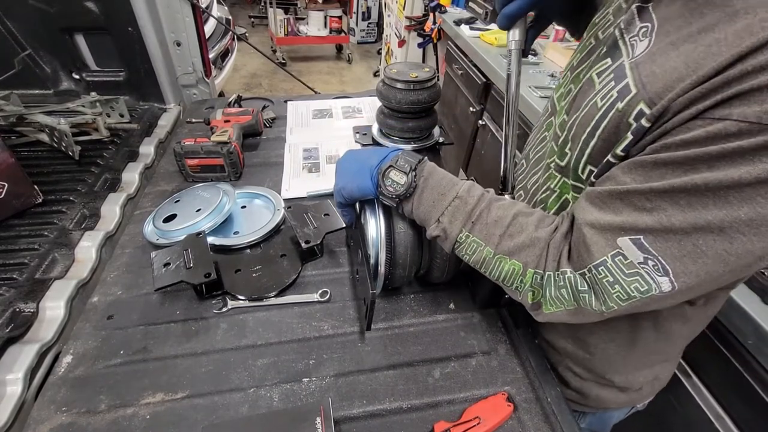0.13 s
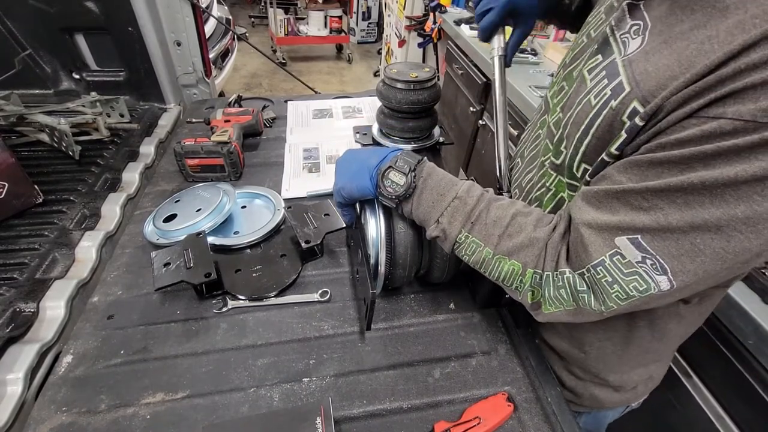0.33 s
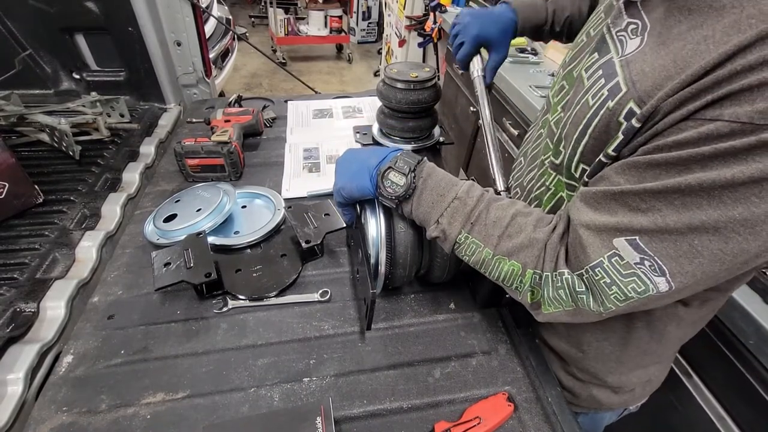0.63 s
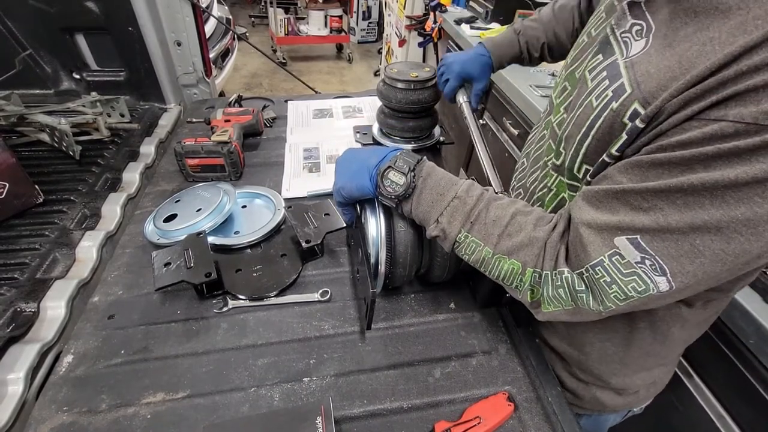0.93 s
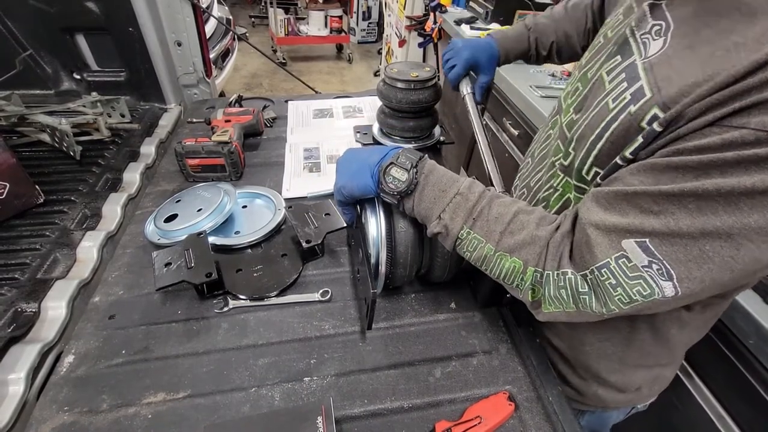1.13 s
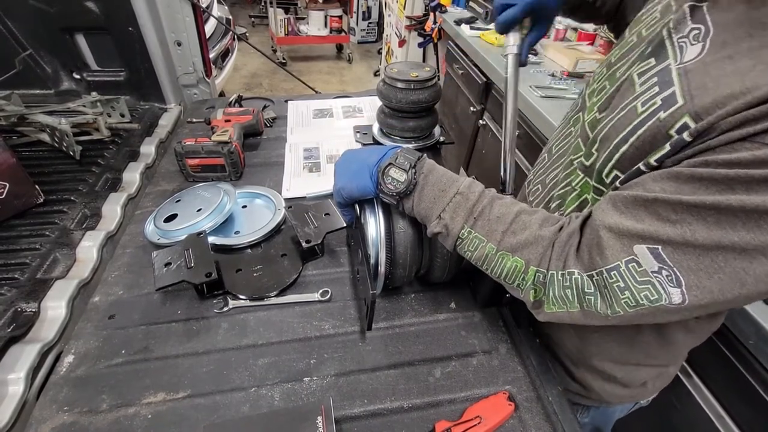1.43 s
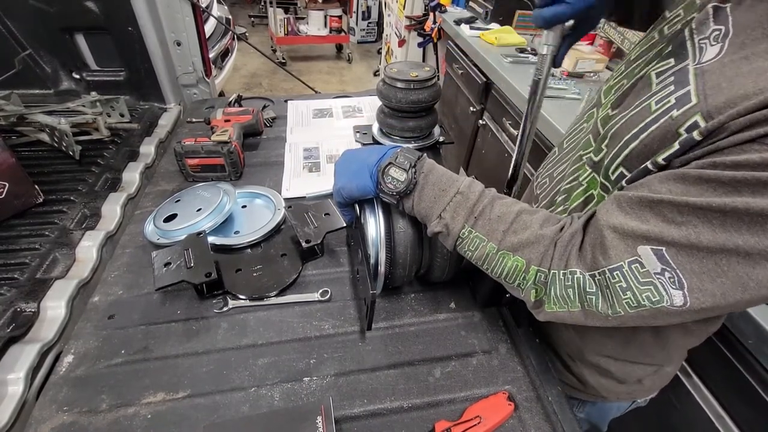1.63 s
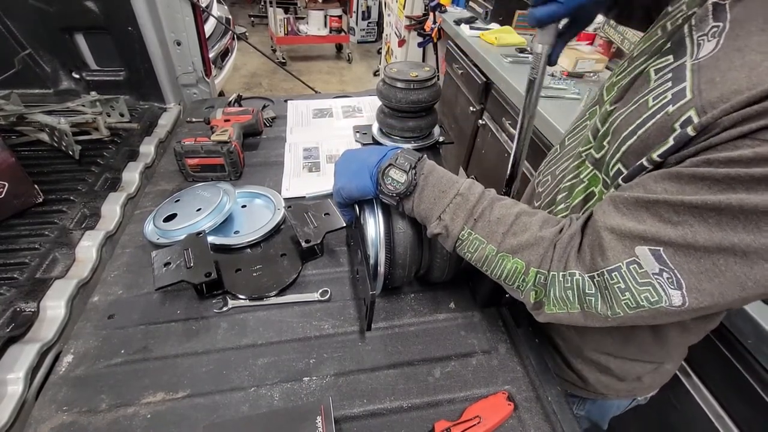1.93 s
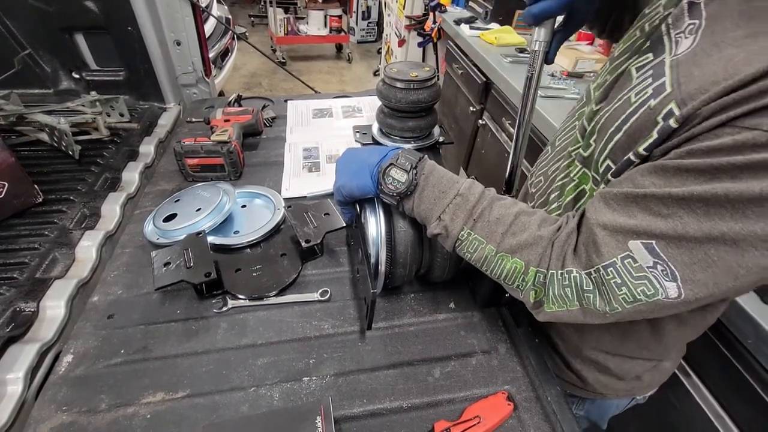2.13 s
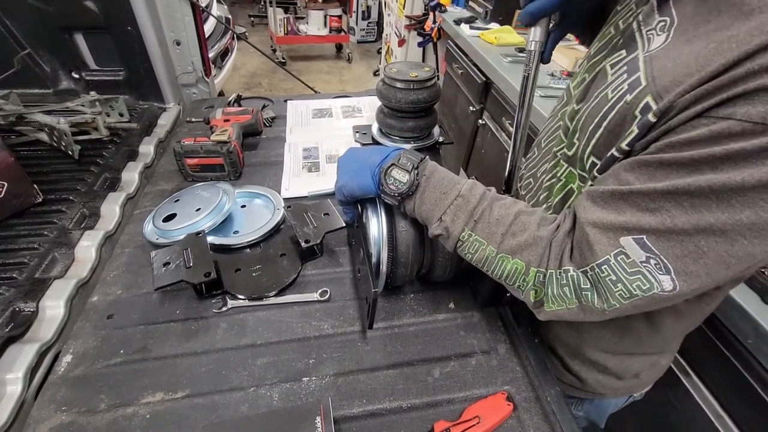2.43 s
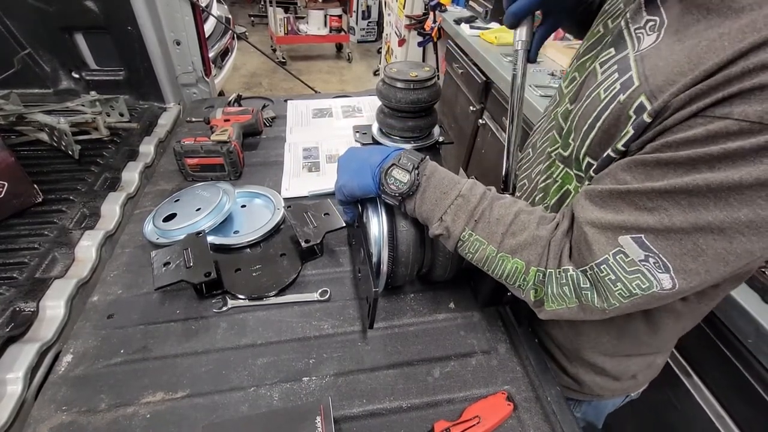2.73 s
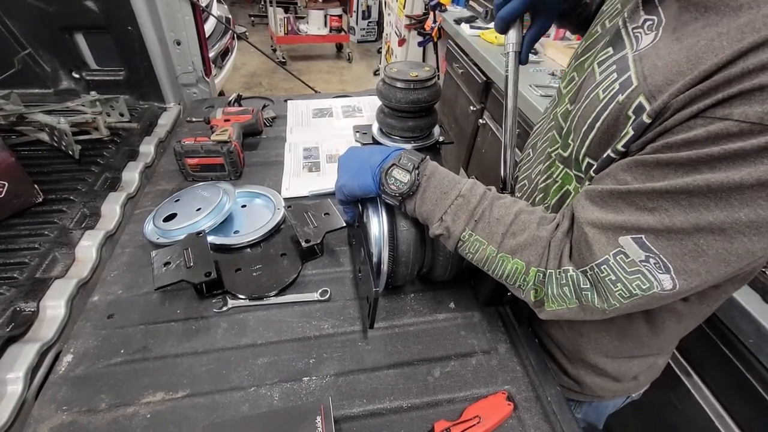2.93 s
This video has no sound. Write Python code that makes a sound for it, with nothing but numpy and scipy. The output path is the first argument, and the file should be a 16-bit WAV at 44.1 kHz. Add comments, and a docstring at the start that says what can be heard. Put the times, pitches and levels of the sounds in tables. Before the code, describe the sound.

Torque wrench tightening a bolt on a steel bracket in a pickup bed: muffled knocks, a short run of steel ratchet clicks, faint glove rubbing, near quiet, then one hard ringing snap in a reflective workshop.

```python
"""Torque wrench in a pickup bed

A stereo pair in a workshop hears a click-type torque wrench tighten a bolt on a steel bracket lying in the bed.
Ventilation rumbles behind, with one brief early hiss. The handle swings back: noise-burst knocks thud into the bed
in sagging tones, glove and sleeve rub, and the pawl ticks over eight teeth as filtered bursts with rings.
More dull knocks follow under the pull, until the wrench breaks over with one loud crack and ringing modes,
and the bracket thumps and rocks. Generated reflections place the sounds in the room."""
import sys
import numpy as np
from scipy import signal
from scipy.fft import rfft, irfft, next_fast_len
from scipy.io import wavfile

SR = 44100
rng = np.random.default_rng(int(sys.argv[2]) if len(sys.argv) > 2 else 0)


def put_to_file(sound):
    """Save the sound as 16-bit audio at rate SR, in the file named by the first command-line argument."""
    columns = np.atleast_2d(sound).T  # one column per channel
    safe = np.clip(columns, -1, 1)
    whole_steps = np.round(safe * 32767)
    wavfile.write(sys.argv[1], SR, whole_steps.astype(np.int16))


N = 136710
TIME = np.arange(N) / SR

# Likeness of the two microphones: hz, correlation
MIC_LIKENESS = [(60, 0.92), (130, 0.88), (260, 0.73), (500, 0), (1500, 0), (8000, 0.083), (15000, 0.054)]
# Workshop: hz, reverberation_t60_s, late_level_db, near_reflection_level_db
ROOM_BANDS = [(59, 0.76, -9.5, -8), (235, 0.56, 1, 4.5), (1000, 0.29, 0, -1), (2920, 0.74, -7, 2),
              (6500, 0.27, 8, -4.5), (9600, 0.33, -15.5, -13.5), (15000, 0.45, -9.5, -2.5)]
NEAR_T60_S, REFLECTION_RISE_S = 0.15, 0.00076

# Ventilation spectrum: hz, relative_density_db (per Hz)
VENTILATION_SPECTRUM = [(25, -22), (50, -2.5), (78, 1.5), (115, -2), (170, -14.5), (260, -7.5), (400, -17),
                        (560, -17.5), (780, -17.5), (1200, -27.5), (2000, -34), (3000, -37), (4700, -44.5),
                        (7400, -43.5), (8600, -58), (11300, -55.5), (12500, -47.5), (16000, -46)]
VENTILATION_DB = -57.5
# Colour of the brief soft hiss: hz, relative_level_db
HISS_SPECTRUM = [(200, -43), (1000, 0), (3000, -1.5), (4500, 0.5), (6300, 7.5), (8500, 0.5), (12000, -4.5),
                 (15500, -10)]
HISS_START_S, HISS_RISE_S, HISS_FALL_S, HISS_DB = 0.081, 0.013, 0.045, -37

# The bracket shifts on the bed: start_s, thud_level_db, thud_start_hz, contact_level_db, contact_lowpass_hz
KNOCKS = [(1.033, -43.5, 349, -24, 1200), (1.083, -51, 406, -33.5, 7300), (1.109, -38.5, 376, -43, 505),
          (1.153, -41, 351, -21, 2300), (1.176, -45.5, 370, -26.5, 1100), (1.200, -39.5, 197, -31, 1530),
          (1.249, -46, 341, -36.5, 800), (1.270, -45.5, 172, -48, 604), (1.889, -58, 476, -31, 990),
          (1.896, -40.5, 389, -36.5, 615), (1.923, -55, 477, -37, 500), (1.953, -41.5, 339, -36.5, 1200),
          (1.994, -51.5, 330, -35.5, 1213), (2.037, -39, 399, -28.5, 770), (2.066, -39.5, 175, -33, 600),
          (2.286, -51.5, 443.6, -41, 910), (2.372, -51, 95, -60, 509), (2.899, -56, 378, -31, 900),
          (3.027, -34.5, 358, -34, 700), (3.068, -36.5, 192, -19, 587)]
KNOCK_RISE_S, KNOCK_FALL_S, KNOCK_ROOM_DB = 0.0014, 0.0015, 0
THUD_PEAK_S, THUD_SAG_S, THUD_END_HZ, THUD_ROOM_DB = 0.0094, 0.01516, 91.3, -8.5
TOOTH_THUD_HZ, TOOTH_THUD_LAG_S = 306.6, 0.00408
# Colour of the steel bracket's clack: hz, relative_level_db
CLACK_SPECTRUM = [(300, 1.5), (550, -5), (750, 7.5), (930, -3.5), (1130, 4.5), (1420, -8.5), (1830, -1),
                  (2020, -16), (2250, -5.5), (2600, -6), (2870, -5), (3200, -13), (3520, -2), (3900, -12),
                  (5000, -12.5), (7000, -6.5), (11000, -29)]
# Ring of the steel bracket, relative to each contact: hz, level_db, t60_s
BRACKET_MODES = [(751, -35, 0.11), (1146, -46, 0.08), (1700, -43, 0.15), (1818, -40, 0.13),
                 (2900, -56, 0.064), (3532, -41.5, 0.2)]
# Ring of the bed under the bracket, relative to each thud: hz, level_db, t60_s
BED_MODES = [(31.3, -10, 0.56), (77.7, -2.5, 0.4), (121.3, 6, 0.22), (163.6, 4, 0.18), (233, -4, 0.14),
             (274, 2, 0.08), (330, -2, 0.1), (388.5, 2.5, 0.12), (477, -12.5, 0.2), (602, 0, 0.13)]
BED_RING_DB, BED_LOWPASS_HZ = -10, 380

# Faint rubbing of glove and sleeve: start_s, level_db, fall_s (the rise takes half as long)
RUBS = [(1.177, -28.5, 0.11), (1.938, -40, 0.015), (2.04, -35.5, 0.031), (2.208, -33.5, 0.035),
        (2.268, -37, 0.024)]
# Colour of the rubbing: hz, relative_level_db
RUB_SPECTRUM = [(400, 5.5), (800, 6), (1800, -6), (3800, -14), (7000, -18), (11000, -30)]
GRIT_SPREAD_DB, GRIT_PER_S = 7.5, 350

# The pawl drops over a tooth: start_s, level_db (added to PAWL_DB), tilt_db_per_octave, bed_thud_level_db,
# pan_db (left minus right), rise_s, brightest_ring_hz, clink_hz, clink_db (added to CLINK_DB),
# muted_hz, brightest_ring_db
TEETH = [(1.2841, 0, -2, -54, 1.5, 0.0023, 2770, 1750, -8, 1420, 9),
         (1.3507, 0, -1, -55, -1, 0.0022, 6050, 1135, 5, 1950, -7),
         (1.4175, 3, -1, -64, -1, 0.00072, 1280, 598, -1.5, 4300, 8),
         (1.4781, 3.5, -1, -47, 1, 0.0027, 3530, 607, -6.5, 1350, -1),
         (1.5423, 4, 2.3, -40.5, 0.5, 0.0023, 5200, 1138, -2.5, 1450, 3),
         (1.621, 1, 0, -64, 1, 0.002, 6140, 1146, -19, 2560, -2),
         (1.7104, 1.5, 2.5, -45.5, 2, 0.0028, 6560, 950, -7.5, 1900, 8),
         (1.8227, -9, 0, -52.5, 1, 0.0011, 5200, 784, 0, 2130, 18)]
PAWL_DB, PAWL_FALL_S, PAWL_ROOM_DB = -21.5, 0.00158, 0.5
# Colour of a tooth before its tilt: hz, relative_level_db
PAWL_SPECTRUM = [(300, -1), (800, -7), (1250, -9.5), (1600, -4.5), (2400, -3), (3400, -1), (4200, -4.5),
                 (5400, 0.5), (6700, 2.5), (8500, -4.5), (10000, -3.5), (11800, -10), (15000, -6)]
# Ring of the ratchet head, relative to the tick: hz, level_db, t60_s
HEAD_MODES = [(1126, -43.5, 0.05), (1238, -32, 0.02), (1750, -50.5, 0.11), (3340, -45, 0.062),
              (6240, -46.5, 0.11), (7800, -46, 0.14)]
BRIGHT_WIDTH_HZ, MUTE_Q = 300, 5.1
BOUNCE_GAIN, BOUNCE_RANGE_S = 0.38, (0.00037, 0.0014)
CLINK_DB, CLINK_T60_S = -27.5, 0.071

# Colour of the break-over crack: hz, relative_level_db
BREAK_SPECTRUM = [(200, -5.5), (500, 3.5), (750, 1), (1130, 2.5), (1450, -6), (1800, -5), (2150, -6),
                  (2800, -8), (3330, 0), (4400, -15), (5250, -12), (6300, -17.5), (7100, -8), (7650, -4),
                  (8400, -18.5), (10500, -20.5), (12500, -22.5), (15000, -23)]
# Wrench, bracket and bed ring together as the load lets go: hz, level_db, t60_s
JOLT_MODES = [(59.7, -18.5, 0.2), (109.5, -32, 0.26), (129, -27.5, 0.13), (193, -31, 0.24),
              (261, -34, 0.14), (368, -30.5, 0.14), (403, -41, 0.064), (486, -38.5, 0.23),
              (556, -35.5, 0.13), (760, -44, 0.12), (1010, -48, .1), (1036, -52.5, 0.11),
              (1154, -39.5, 0.091), (2950, -46, .2), (3260, -52, 0.16), (3317, -39.5, 0.15),
              (3454, -47, 0.11), (7280, -60, 0.2), (7800, -60, 0.28)]
BREAK_START_S, BREAK_DB, BREAK_RISE_S, BREAK_FALL_S = 2.9922, -5, 0.00054, 0.003
BREAK_ROOM_DB, JOLT_ROOM_DB = 0, -8

BUILD_UP_CYCLES = 0.59  # time constant of a struck mode
CUTOFF_HZ = 16000


def from_db(db):
    """Decibels to gain."""
    return 10 ** (np.asarray(db) / 20)


def at_hz(points, hz, axis=1):
    """Read a table column on a log-frequency axis."""
    table = np.array(points)
    return np.interp(np.log(np.maximum(hz, 1)), np.log(table[:, 0]), table[:, axis])


def add(out, start_s, sound):
    """Mix a sound in at a time."""
    i = int(start_s * SR)
    out[:, i:i + sound.shape[-1]] += sound[..., :N - i]


def stereo_noise(size):
    """White noise at two microphones, alike in the bass and nearly unrelated in the treble."""
    alike = np.clip(at_hz(MIC_LIKENESS, np.fft.rfftfreq(size, 1 / SR)), -1, 1)
    mid, side = rfft(rng.standard_normal((2, size)))
    shared = np.sqrt((1 + alike) / 2) * mid
    opposed = np.sqrt((1 - alike) / 2) * side * [[1], [-1]]
    return irfft(shared + opposed, size)


def colour(x, spectrum, tilt_db=0):
    """Causal (minimum-phase) filter with the given spectrum and unit power gain."""
    size = 2 * next_fast_len(x.shape[-1])
    hz = np.fft.rfftfreq(size, 1 / SR)
    octaves = np.log2(np.maximum(hz, spectrum[0][0]))
    gain = from_db(at_hz(spectrum, hz) + tilt_db * octaves)
    cepstrum = irfft(np.log(gain / np.sqrt(np.mean(gain ** 2))))
    # Folding the cepstrum forward in time gives minimum phase
    cepstrum[1:size // 2] *= 2
    cepstrum[size // 2 + 1:] = 0
    response = np.exp(rfft(cepstrum))
    return irfft(rfft(x, size) * response)[..., :x.shape[-1]]


def soften(x, hz):
    """A soft contact: two-pole low-pass."""
    return signal.sosfilt(signal.butter(2, min(hz, SR / 3), fs=SR, output="sos"), x)


def chatter(rise_s, fall_s):
    """A contact's rush of tiny impacts: noise that swells and dies, of nearly even spectrum and unit energy."""
    t = TIME[:SR // 2]
    swell = np.minimum(t / rise_s, 1) * np.exp(-np.maximum(t - rise_s, 0) / fall_s)
    x = stereo_noise(len(t)) * swell
    # Alternately flatten the spectrum and confine the burst in time
    for _ in range(4):
        flat = irfft(np.exp(1j * np.angle(rfft(x))), len(t))
        x = flat * np.minimum(5 * swell, 1)
    return x / np.sqrt(np.sum(x ** 2, axis=1, keepdims=True))


def ring(modes, scatter_db=0):
    """Struck modes build up over part of a cycle; the higher ones reach the two microphones out of step."""
    t, out = TIME[:SR // 2], 0
    for hz, db, t60_s in modes:
        half_angle = np.arccos(np.clip(at_hz(MIC_LIKENESS, hz), -1, 1)) / 2
        phase = half_angle * rng.choice([-1, 1]) * np.array([[1], [-1]])
        decay = from_db(db + scatter_db * rng.normal() - 60 * t / t60_s)
        build_up = 1 - np.exp(-t * hz / BUILD_UP_CYCLES)
        out = out + rng.choice([-1, 1]) * decay * build_up * np.sin(2 * np.pi * hz * t + phase)
    return out


def workshop():
    """Impulse response: quick reflections off the bed walls, then the hall, each octave dying at its own rate."""
    t, out = TIME[:SR * 2 // 3], 0
    white, bins = rfft(stereo_noise(len(t))), np.fft.rfftfreq(len(t), 1 / SR)
    for hz in 62.5 * 2 ** np.arange(9):
        octave = np.maximum(1 - abs(np.log2((bins + 1) / hz)), 0)
        band = irfft(white * octave, len(t))
        late = at_hz(ROOM_BANDS, hz), at_hz(ROOM_BANDS, hz, axis=2)
        near = NEAR_T60_S, at_hz(ROOM_BANDS, hz, axis=3)
        for t60_s, db in late, near:
            decay = from_db(-60 * t / t60_s) * np.minimum(t / REFLECTION_RISE_S, 1) ** 2
            out = out + from_db(db) * band * decay / np.sqrt(np.sum(decay ** 2))
            band = band[:, ::-1]  # the same noise backwards serves the near reflections
    return out


def in_room(x, room, wet_db):
    """Direct sound plus its reflections, which are fed from the left channel."""
    wet = signal.fftconvolve(x[:1], room, axes=1)[:, :x.shape[-1]]
    return x + from_db(wet_db) * wet


def background(room):
    """Steady ventilation as coloured noise, and one brief soft hiss as a slow noise burst."""
    # One second of lead-in lets the filter settle
    out = from_db(VENTILATION_DB) * colour(stereo_noise(N + SR), VENTILATION_SPECTRUM)[:, SR:]
    hiss = from_db(HISS_DB) * colour(chatter(HISS_RISE_S, HISS_FALL_S), HISS_SPECTRUM)
    add(out, HISS_START_S, in_room(hiss, room, wet_db=7.5))
    return out


def bending_wave(start_hz):
    """A thud crosses the sheet-metal bed: its higher tones arrive first, so the pitch sags."""
    t = TIME[:SR // 4]
    hz = THUD_END_HZ + (start_hz - THUD_END_HZ) * np.exp(-t / THUD_SAG_S)
    swell = t / THUD_PEAK_S * np.exp(1 - t / THUD_PEAK_S)
    return swell * np.sin(2 * np.pi * np.cumsum(hz) / SR)


def bracket(room):
    """Knocks and ratchet teeth thud into the bed; knocks also make the bracket clack and ring."""
    thuds, clacks = np.zeros((2, 2, N))
    knock_thuds = [row[:3] for row in KNOCKS]
    tooth_thuds = [(row[0] + TOOTH_THUD_LAG_S, row[3], TOOTH_THUD_HZ) for row in TEETH]
    for start_s, db, start_hz in knock_thuds + tooth_thuds:
        add(thuds, start_s, from_db(db) * bending_wave(start_hz))
        bed = soften(ring(BED_MODES, scatter_db=4.5), BED_LOWPASS_HZ)
        add(thuds, start_s, from_db(db + BED_RING_DB) * bed)
    for start_s, _, _, db, lowpass_hz in KNOCKS:
        clack = colour(chatter(KNOCK_RISE_S, KNOCK_FALL_S), CLACK_SPECTRUM)
        steel = ring(BRACKET_MODES, scatter_db=3.0)
        add(clacks, start_s, from_db(db) * soften(clack + steel, lowpass_hz))
    return in_room(thuds, room, THUD_ROOM_DB) + in_room(clacks, room, KNOCK_ROOM_DB)


def rubbing(room):
    """Glove and sleeve slide a little as the grip changes, catching and slipping in fine grains."""
    out = np.zeros((2, N))
    for start_s, db, fall_s in RUBS:
        slide = chatter(fall_s / 2, fall_s)
        grains = rng.standard_normal(SR // 20)
        wander = np.interp(TIME[:SR // 2] * GRIT_PER_S, np.arange(SR // 20), grains)
        grit = from_db(GRIT_SPREAD_DB * wander)
        rub = colour(slide * grit / np.sqrt(np.mean(grit ** 2)), RUB_SPECTRUM)
        add(out, start_s, from_db(db) * rub)
    return in_room(out, room, wet_db=-4.5)


def ratchet():
    """Each tooth is a steel tick with a bounce and a clink; the head turns, so colour and reflections change."""
    out = np.zeros((2, N))
    for (start_s, db, tilt_db, _, pan_db, rise_s,
         bright_hz, clink_hz, clink_db, mute_hz, bright_db) in TEETH:
        tick = colour(chatter(rise_s, PAWL_FALL_S), PAWL_SPECTRUM, tilt_db)
        bounce_samples = int(rng.uniform(*BOUNCE_RANGE_S) * SR)
        tick = tick + BOUNCE_GAIN * np.roll(tick, bounce_samples, axis=1)
        # One band stays nearly unexcited, another rings brightest
        tick = signal.lfilter(*signal.iirnotch(mute_hz, MUTE_Q, fs=SR), tick)
        peak = signal.iirpeak(bright_hz, bright_hz / BRIGHT_WIDTH_HZ, fs=SR)
        bright = from_db(bright_db) * signal.lfilter(*peak, tick)
        # Socket or bracket clink
        clink = ring([(clink_hz, CLINK_DB + clink_db, CLINK_T60_S)])
        head = ring(HEAD_MODES, scatter_db=7.0)
        sound = in_room(tick + head, workshop(), PAWL_ROOM_DB) + bright + clink
        pan = pan_db * np.array([[.5], [-.5]])
        add(out, start_s, from_db(PAWL_DB + db + pan) * sound)
    return out


def break_over(room):
    """The torque is reached: a hard crack, and everything under load rings."""
    out = np.zeros((2, N))
    crack = from_db(BREAK_DB) * colour(chatter(BREAK_RISE_S, BREAK_FALL_S), BREAK_SPECTRUM)
    jolt = ring(JOLT_MODES)
    add(out, BREAK_START_S, in_room(crack, room, BREAK_ROOM_DB) + in_room(jolt, room, JOLT_ROOM_DB))
    return out * from_db([[.7], [-.7]])  # slightly left


def scene():
    """All sources in the one workshop."""
    room = workshop()
    return background(room) + bracket(room) + rubbing(room) + ratchet() + break_over(room)


def record(dry):
    """The top is cut steeply by an elliptic low-pass."""
    return signal.sosfilt(signal.ellip(10, .2, 70, CUTOFF_HZ, fs=SR, output="sos"), dry)


dry = scene()
out = record(dry)
put_to_file(out)
```